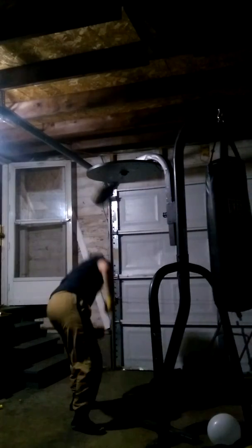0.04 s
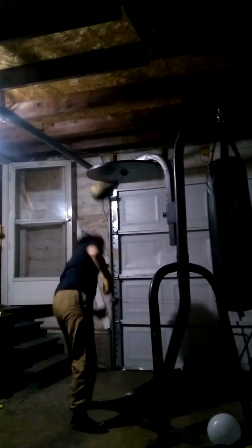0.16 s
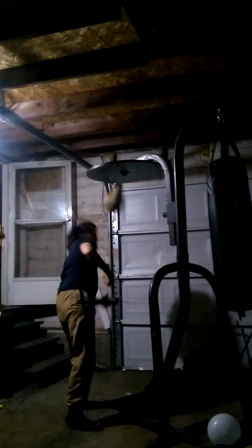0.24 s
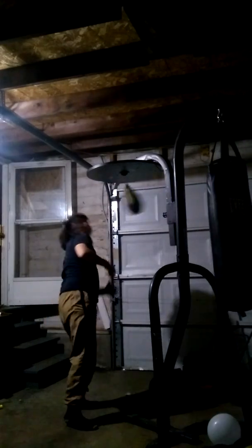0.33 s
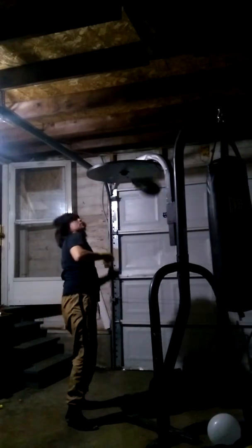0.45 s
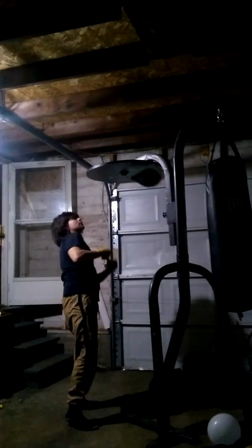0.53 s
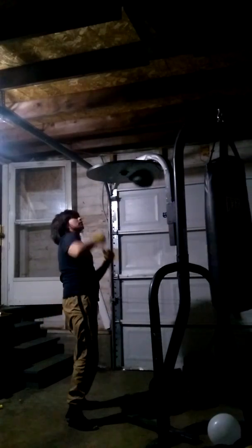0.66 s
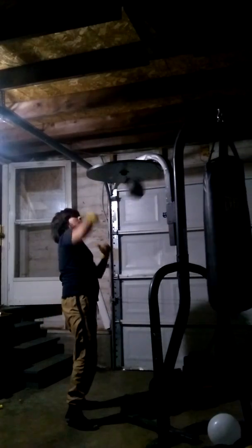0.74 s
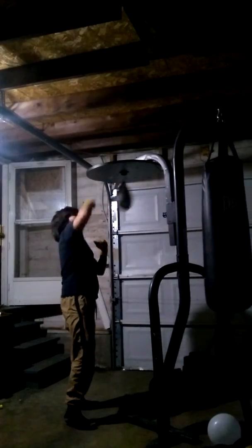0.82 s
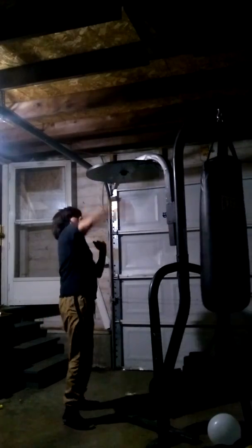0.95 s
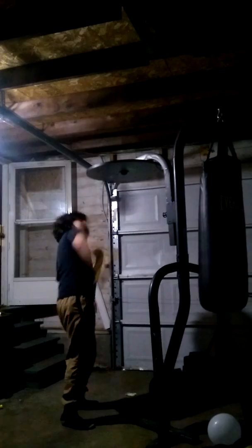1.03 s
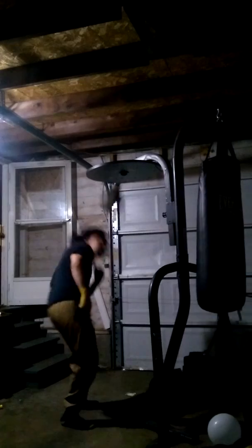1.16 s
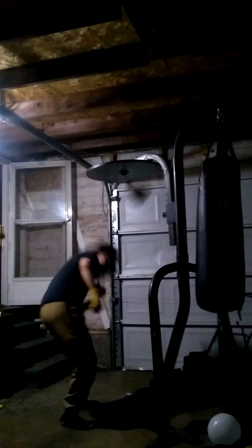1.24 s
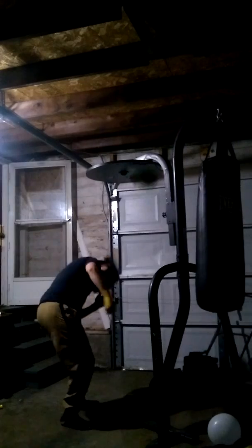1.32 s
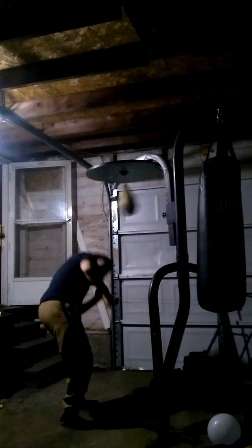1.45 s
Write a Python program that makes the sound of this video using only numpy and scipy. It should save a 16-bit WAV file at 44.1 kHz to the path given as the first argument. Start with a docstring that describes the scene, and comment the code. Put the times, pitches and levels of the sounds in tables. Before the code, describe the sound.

One hard speed bag hit, dull thud then sharp board slam and metal crack, echoing in a garage

```python
"""Cloth and soles brush softly; a fist drives a speed bag into its rebound board in a garage at about 0.23 s.
After the dull punch come the slam into the board and the crack of the steel swivel, each within 0.06 s.
Weaker rebounds and more scuffs follow in the room's tail, over steady room tone. Contacts are sprays of noise
grains that also ring the board's modes; the crack is evened noise, the scuffs and air are coloured hiss.
Echoes and fading noise make the garage. Two spaced capsules are steered left and right."""
import sys
import numpy as np
from scipy import signal
from scipy.fft import rfft, irfft, next_fast_len
from scipy.io import wavfile
from scipy.ndimage import uniform_filter1d

SR = 44100
rng = np.random.default_rng(int(sys.argv[2]) if len(sys.argv) > 2 else 0)


def magnitude_from_level(level_db):
    """Linear magnitude for a level in decibels (20 dB per decade)."""
    exponent = np.asarray(level_db, float) / 20
    return 10 ** exponent


def to_wav(s):
    """Save 16-bit WAV."""
    ch = np.atleast_2d(s).T  # columns
    pcm = np.round(np.clip(ch, -1, 1) * 32767)  # PCM
    wavfile.write(sys.argv[1], SR, pcm.astype(np.int16))


N = 66150   # samples: 1.5 s
SIZE = next_fast_len(N + SR)   # transform length, padded against wrap-around
HZ = np.maximum(np.arange(SIZE // 2 + 1) * SR / SIZE, 1)
SPACING_M, SOUND_SPEED_M_S = 0.11, 343   # between the two capsules


def at_hz(points, hz):
    """Read a curve by straight lines on a log-frequency axis."""
    point_hz, value = np.array(points).T
    return np.interp(np.log(hz), np.log(point_hz), value)


def shape(x, response):
    """Filter by a response given on the HZ grid."""
    return irfft(rfft(x, SIZE) * response, SIZE)[..., :N]


def late(delay_s):
    """Response of a pure delay: phase falls in proportion to frequency."""
    return np.exp(-2j * np.pi * HZ * delay_s)


def decay(start, t60, rise=0.00043):
    """Envelope that rises linearly from start, then loses 60 dB every t60 seconds."""
    t = np.arange(N) / SR - start
    return np.clip(t / rise, 0, 1) * magnitude_from_level(-60 * np.maximum(t - rise, 0) / t60)


def capsules(mid, side):
    """Diffuse sound at two capsules: alike in the bass, unrelated in the treble."""
    alike = np.sinc(2 * HZ * SPACING_M / SOUND_SPEED_M_S)
    mid = shape(mid, np.sqrt((1 + alike) / 2))
    side = shape(side, np.sqrt((1 - alike) / 2))
    return np.array([mid + side, mid - side])


def hiss(spectrum):
    """Diffuse noise of a given colour, rms 1."""
    x = shape(capsules(*rng.standard_normal((2, N))), magnitude_from_level(at_hz(spectrum, HZ)))
    return x / x.std()


def noise_grains():
    """Rough contact texture: steady noise with sparse spikes of uneven strength and either sign."""
    grains_per_s, spread_db = 6000, 2.0
    hits = rng.random(N) < grains_per_s / SR
    strength = magnitude_from_level(spread_db * np.minimum(rng.exponential(1, N), 3))
    return rng.standard_normal(N) * 0.58 + hits * strength * rng.choice([-1, 1], N)


# leather and board contacts, levels relative to each other: (time [s], level [dB], band top [Hz],
# band bottom [Hz], rise [s], die-away t60 [s], drive into the board modes [dB])
CONTACTS = [(0.2272, -11.5, 433, 250, 0.0004, 0.09, -22.5), (.2287, -20.5, 4900, 1500, .002, 0.19, -55),
            (.2289, -16, 13000, 3200, 0.0015, 0.014, -54), (.2478, -12, 410, 268, 0.00072, 0.027, -26),
            (.232, -28, 248, 58, 0.0072, 0.024, -17.5), (.2712, -0.5, 807, 466, 0.00059, 0.0091, -11.5),
            (.275, -39, 190, 80, 0.0019, 0.023, -26), (.2722, -8.5, 8000, 1200, 0.001, 0.033, -14.5),
            (.415, -29, 890, 89, 0.0032, 0.03, -34), (0.68, -27, 12400, 1200, 0.00023, 0.042, -73),
            (.605, -44.5, 1270, 150, 0.0037, 0.5, -52), (.645, -35, 2830, 960, 0.013, 0.14, -59),
            (0.633, -47, 193, 123, .02, 0.45, -47), (0.769, -31, 8400, 1430, 0.00027, 0.15, -73),
            (.765, -42.5, 980, 532, 0.011, 0.14, -45), (0.75, -43.5, 830, 590, 0.025, 0.036, -59),
            (.902, -39, 1000, 200, 0.023, 0.14, -51.5), (.922, -35, 4460, 1000, 0.00029, 0.16, -56),
            (0.77, -32, 11000, 3400, 0.00024, .03, -70), (.965, -42, 1580, 1010, 0.01, 0.087, -71.5),
            (1.273, -42.5, 540, 205, 0.0021, 0.28, -54.5), (1.278, -42, 1290, 740, 0.0084, 0.16, -57.5),
            (1.283, -43.5, 2265, 700, 0.015, 0.13, -69), (1.415, -45, 640, 380, 0.021, 0.17, -64.5)]
# modes of board and frame: (frequency [Hz], relative level [dB])
BOARD_MODES = [(84, -20), (112, -7.5), (151.7, -8), (277, -20.5), (345, -4), (430, -8.5), (500, -3.5),
               (612, 5.5), (690, -6), (797, -1.5), (860, 2), (990, 6.5), (1230, 7), (1510, -9.5)]


def blows():
    """Each contact is a dying spray of grains, heard bare and through the damped board modes."""
    first_touch_db = 13   # the first grain of a sudden contact stands out
    ring_cycles = 26.0   # wood damps every mode by 60 dB within this many cycles
    out, grains = np.zeros(N), noise_grains()
    # each contact excites each mode a little differently
    strengths_db = rng.normal(0, 2.5, (len(CONTACTS), len(BOARD_MODES)))
    pushes = np.zeros((len(CONTACTS), N))
    for k, (start, db, top_hz, low_hz, rise, t60, ring_db) in enumerate(CONTACTS):
        band = signal.butter(2, [low_hz, top_hz], "band", fs=SR, output="sos")
        envelope = decay(start, t60, rise)
        touch = grains * envelope + 1e-18
        # a slow contact gets a silent sample here instead
        touch[int((start + rise) * SR)] = magnitude_from_level(first_touch_db) * (rise < .003)
        spray = signal.sosfilt(band, touch)
        # the spray takes the energy of its envelope, whatever its band
        spray = spray * np.sqrt(np.sum(envelope ** 2) / np.sum(spray ** 2))
        out += magnitude_from_level(db) * spray
        pushes[k] = magnitude_from_level(ring_db) * spray
    for (hz, db), extra_db in zip(BOARD_MODES, strengths_db.T):
        radius = magnitude_from_level(-60 * hz / (ring_cycles * SR))
        angle = 2 * np.pi * hz / SR
        resonator = [1, -2 * radius * np.cos(angle), radius ** 2]
        push = magnitude_from_level(db + extra_db) @ pushes
        out += signal.lfilter([0, .05 * np.sin(angle)], resonator, push)
    return out


# cracks of the steel swivel: (time [s], level before evening [dB])
SWIVEL_CRACKS = [(0.2787, 16.5), (0.2791, 19)]


def swivel():
    """Very short bursts of bright noise, their joint spectrum evened and their bass removed."""
    burst_t60_s, low_hz = 0.0015, 1270
    bursts = sum(magnitude_from_level(db) * decay(start, burst_t60_s, rise=.0001) for start, db in SWIVEL_CRACKS)
    noise = rng.standard_normal(N) * bursts
    size = np.abs(rfft(noise, SIZE))
    even = shape(noise, np.sqrt(np.mean(size ** 2)) / (size + .15 * size.mean()))
    # evening smears the burst in time: fade what spills around it
    even = even * decay(SWIVEL_CRACKS[0][0] - .0004, .02)
    return signal.sosfilt(signal.butter(2, low_hz, "high", fs=SR, output="sos"), even + 1e-18)


# cloth and soles brushing, relative levels:
# (time [s], rise [s], bright hiss level [dB], dull rub level [dB], die-away t60 [s])
BRUSHES = [(-.1, 0.15, -91, -64.5, 2.6), (0.099, 0.12, -59.5, -62.5, 0.11),
           (0.999, 0.04, -74.5, -61.5, 0.47), (1.222, 0.012, -55, -77, 0.59)]
# colour of the bright hiss: (frequency [Hz], relative level [dB])
BRIGHT_COLOUR = [(1500, -31), (3000, -24.5), (5500, -18.5), (8500, -11.5), (12000, -18), (15500, -27)]
# colour of the dull rub: (frequency [Hz], relative level [dB])
DULL_COLOUR = [(60, -18), (120, 5.5), (400, 3.5), (1100, -5), (2000, -20), (5000, -38)]


def scuffs():
    """Friction of cloth and soles: bright and dull noise that swell and fade together."""
    bright, dull = hiss(BRIGHT_COLOUR), hiss(DULL_COLOUR)
    return sum(decay(start, t60, rise) * (magnitude_from_level(bright_db) * bright + magnitude_from_level(dull_db) * dull)
               for start, rise, bright_db, dull_db, t60 in BRUSHES)


# ceiling, door and wall: (delay [s], level [dB])
EARLY_ECHOES = [(.0103, -11), (.0215, -12), (.029, -15)]


def early_echoes(x):
    """Each surface returns one delayed copy, at a slightly different moment for each capsule."""
    low_hz = 900   # beams and panels throw back little bass
    offsets_s = rng.uniform(-1, 1, len(EARLY_ECHOES)) * SPACING_M / (2 * SOUND_SPEED_M_S)
    responses = [sum(magnitude_from_level(db) * late(delay + sign * offset)
                     for (delay, db), offset in zip(EARLY_ECHOES, offsets_s)) for sign in (1, -1)]
    return shape(x, np.array(responses) * HZ / (HZ - 1j * low_hz))


# early decay of the room: (frequency [Hz], t60 [s])
EARLY_DECAY = [(60, 0.29), (150, 0.51), (400, 0.29), (1000, 0.35), (3000, 0.38), (7000, 0.33), (14000, 0.3)]
# colour of the tail, whose treble the walls swallow: (frequency [Hz], relative level [dB])
TAIL_COLOUR = [(60, -2), (300, 0.5), (700, -1.5), (1500, 1), (4000, 1), (9000, 2.5), (15000, -5.5)]


def room_tail(x):
    """Dense reflections as noise that dies band by band in two slopes."""
    room_db, rise_s, gap_s = 2.5, 0.0067, 0.0019
    late_db, late_times = -14, 2.46   # a weaker, longer tail under the early decay
    peak_limit_db = 1.5   # limit on chance peaks in the noise spectrum, so the tail sounds even
    edges = 40 * 2 ** np.arange(0, 9.1, .5)   # half octaves [Hz]
    tails = np.zeros((2, 2, N))   # early or late slope, mid or side
    white = rng.standard_normal((2, 2, 2, N))   # neighbouring bands take different noise
    for k, (low, high) in enumerate(zip(edges, edges[1:])):
        sos = signal.butter(2, [low, high], "band", fs=SR, output="sos")
        band = signal.sosfilt(sos, white[k % 2])
        t60 = at_hz(EARLY_DECAY, np.sqrt(low * high))
        tails[0] += band[0] * decay(gap_s, t60, rise_s)
        tails[1] += band[1] * magnitude_from_level(late_db) * decay(gap_s, late_times * t60, rise_s)
    response = rfft(tails, SIZE)
    usual = np.sqrt(uniform_filter1d(np.abs(response) ** 2, size=600))
    response = response * np.minimum(1, magnitude_from_level(peak_limit_db) * usual / np.abs(response))
    response = response * magnitude_from_level(at_hz(TAIL_COLOUR, HZ))
    tail = irfft(response.sum(axis=0), SIZE)[:, :N]
    tail = tail / np.sqrt(np.sum(tail ** 2, axis=1, keepdims=True))
    return magnitude_from_level(room_db) * capsules(*shape(x, rfft(tail, SIZE)))


def garage(x):
    """The room answers with a few distinct echoes and a diffuse tail."""
    return room_tail(x) + early_echoes(x)


# colour of the steady air: (frequency [Hz], relative level per Hz [dB])
AIR_COLOUR = [(45, -28), (80, 4.5), (150, 3), (400, -10.5), (700, -18.5), (1100, -10.5), (2000, -32.5),
              (4000, -23), (9000, -21), (15500, -23.5)]


def room_tone():
    """Steady diffuse air noise, equally strong throughout."""
    return magnitude_from_level(-62) * hiss(AIR_COLOUR)


def scene():
    """Sound pressure at the two capsules: direct sound, room, scuffs and air."""
    crack_aim_db = 9.5   # the crack is louder straight at the recorder than into the room
    arrival_lag_s = 0.00021   # the direct sound reaches the second capsule later
    bag, crack = blows(), swivel()
    arrivals = np.array([late(0), late(arrival_lag_s)])
    direct = shape(bag + magnitude_from_level(crack_aim_db) * crack, arrivals)
    return 0.12 * (direct + garage(bag + crack)) + scuffs() + room_tone()


def low_pass(x):
    """Removes everything above the highest recorded frequency."""
    return signal.sosfilt(signal.butter(12, 16230, fs=SR, output="sos"), x)


# colour of the microphones: (frequency [Hz], level [dB])
MIC_COLOUR = [(35, -35.5), (60, -7), (120, 2.5), (300, 3.5), (800, 3), (2000, 12), (5000, -0.5), (9000, -2),
              (12000, -4.5), (15000, -9)]


def record(dry):
    """Each side is one capsule minus the other, delayed and dulled; then colour, clipping and top cut."""
    steer_lag_s, steer_share, steer_top_hz = 0.0004076, 0.76, 7940
    left_db, clip_level, cutoff_hz = -1.5, 0.82, 15200
    opposite = shape(dry[::-1], late(steer_lag_s) / np.hypot(1, HZ / steer_top_hz))
    steered = dry - steer_share * opposite
    coloured = shape(steered, magnitude_from_level(at_hz(MIC_COLOUR, HZ))) * magnitude_from_level([[left_db], [0]])
    clipped = np.clip(coloured, -clip_level, clip_level)
    mix = signal.sosfilt(signal.butter(10, cutoff_hz, fs=SR, output="sos"), clipped)
    return low_pass(mix)


dry = scene()
out = record(dry)
to_wav(out)
```